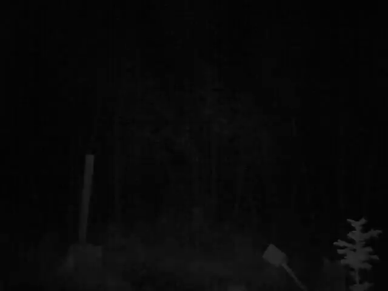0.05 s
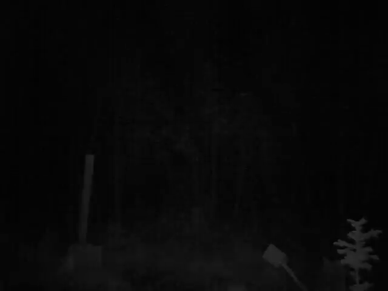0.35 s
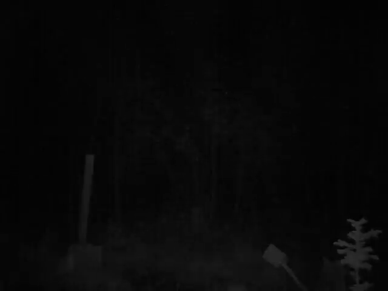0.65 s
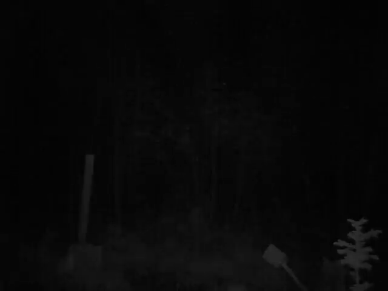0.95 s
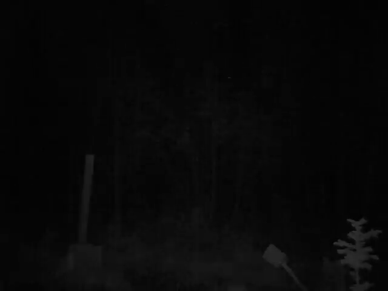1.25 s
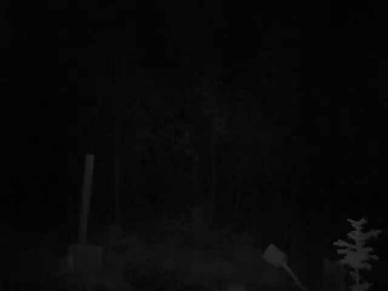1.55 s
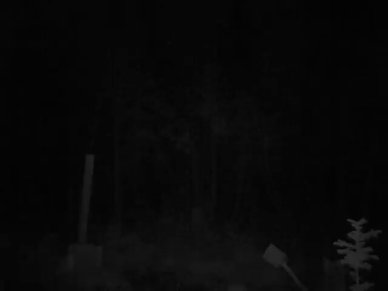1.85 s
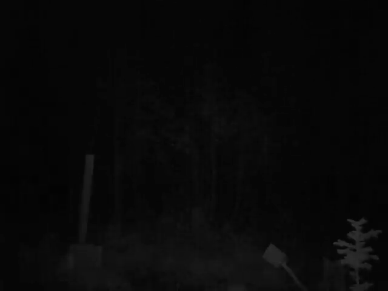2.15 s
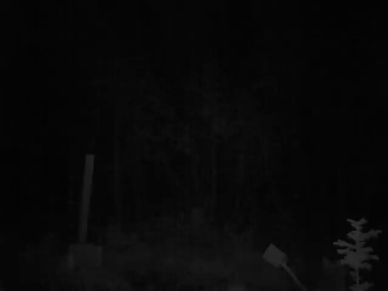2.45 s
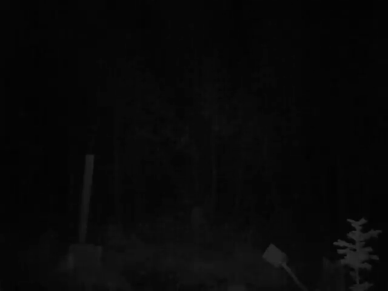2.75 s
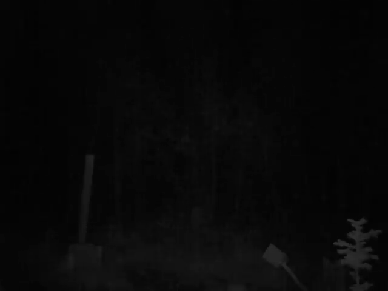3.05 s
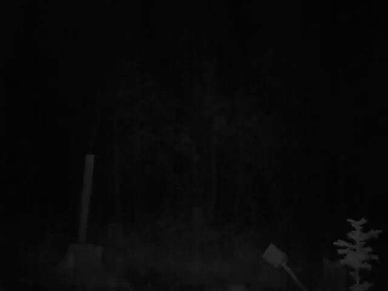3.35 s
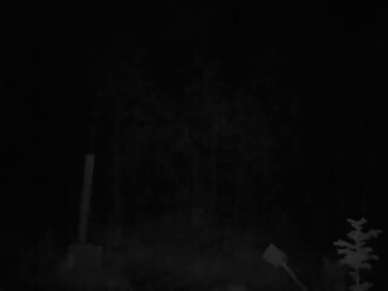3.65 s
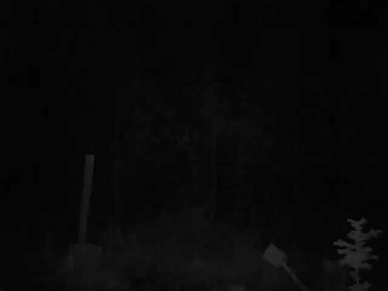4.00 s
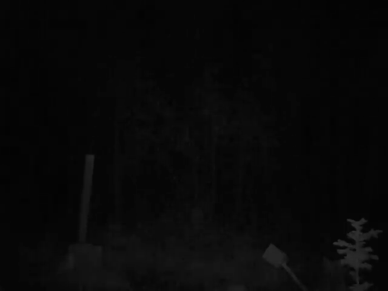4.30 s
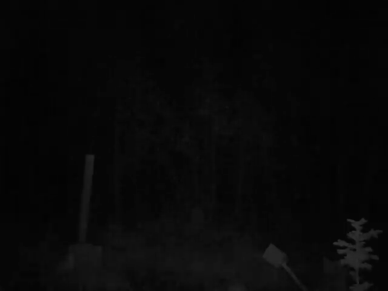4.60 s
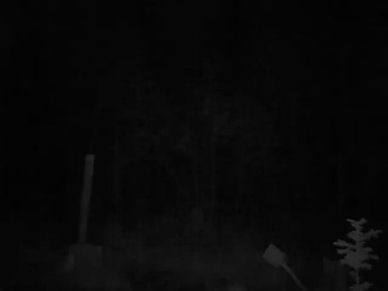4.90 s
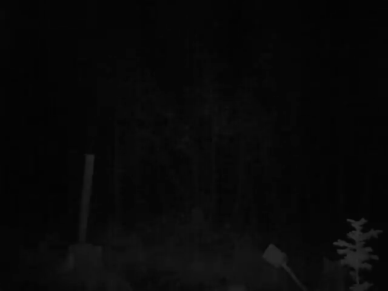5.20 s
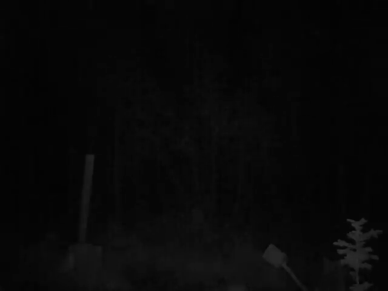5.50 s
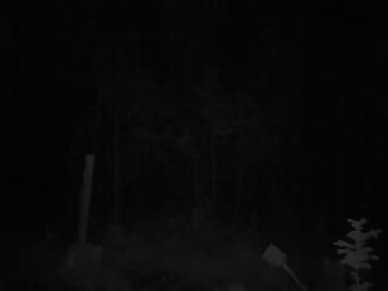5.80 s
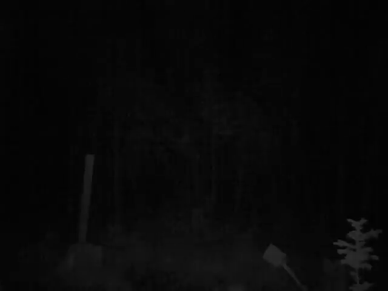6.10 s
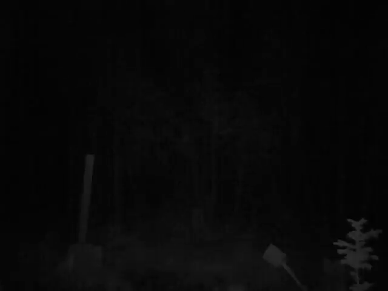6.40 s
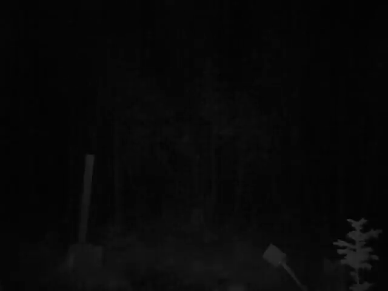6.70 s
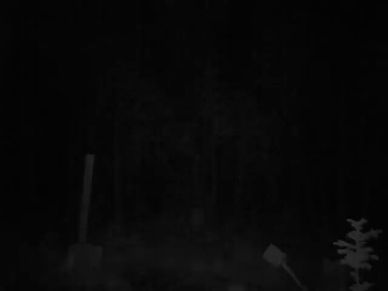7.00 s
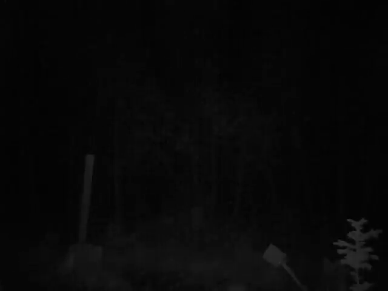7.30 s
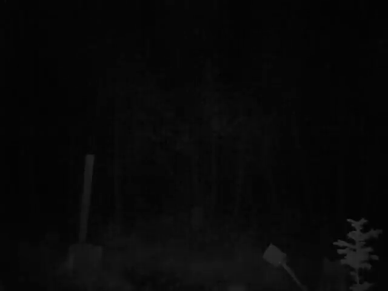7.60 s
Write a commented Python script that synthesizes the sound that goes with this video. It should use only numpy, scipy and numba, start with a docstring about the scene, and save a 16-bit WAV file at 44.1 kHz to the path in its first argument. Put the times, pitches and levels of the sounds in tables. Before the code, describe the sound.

A bull moose gives three short, croaky grunts amid snapping twigs and soft hoof thuds, over steady hiss at a night forest edge.

```python
"""Three short, croaky grunts sound at a forest edge at night: a bull moose.
Each starts tight and rough, then slackens into slow throat pulses that end in a chest thump.
Twigs tick, hooves thud softly and brush rustles, all with a faint echo from the trees.
Low hums come and go. Behind it all lie still forest air and a small recorder's hiss and whine."""
import sys
import numpy as np
from scipy import signal
from scipy.fft import rfft, irfft
from scipy.io import wavfile
from scipy.ndimage import uniform_filter1d
from numba import njit

SR = 44100
rng = np.random.default_rng(int(sys.argv[2]) if len(sys.argv) > 2 else 0)


def store_pcm(level_fs):
    """Save levels as 16-bit WAV."""
    pcm = np.round(np.clip(level_fs, -1, 1) * 32767).astype(np.int16)
    wavfile.write(sys.argv[1], SR, np.atleast_2d(pcm).T)


N = 346185
T = np.arange(N) / SR

# The notes at which the mouth rings, its resonances: (frequency [Hz], width [Hz], relative level [dB])
MOUTH = [(1006, 120, 1.5), (1253, 150, -4), (1540, 190, -13)]
MOUTH_BAND_HZ = (905, 1750)


def undb(db):
    """Turn decibels into a factor to multiply by."""
    return 10 ** (np.asarray(db) / 20)


def unit(x):
    """Scale a sound to an average (rms) level of 1."""
    return x / np.sqrt(np.mean(x ** 2) + 1e-20)


def steady(x):
    """Even out the loudness over a few throat pulses."""
    return x / np.sqrt(uniform_filter1d(x ** 2, size=1400) + 1e-12)


def walk(rate, size):
    """A smooth random wander of about 1 either way, with `rate` new turns a second."""
    hold = max(int(SR / rate), 1)
    stairs = np.repeat(rng.standard_normal(size // hold + 1), hold)
    return 1.335 * uniform_filter1d(stairs, hold)[:size]


def arch(t, length, attack, release):
    """A loudness shape that rises, holds and falls, ending at the given length."""
    return np.clip(t / attack, 0, 1) * np.clip((length - t) / release, 0, 1)


def add(out, start, x):
    """Mix x into out, beginning at `start` seconds."""
    i = int(start * SR)
    out[i:i + len(x)] += x[:len(out) - i]


@njit
def resonate(x, hz, width):
    """A filter that rings around a frequency, which may move every sample."""
    y, band_state, low_state = np.empty(len(x)), 0., 0.
    for i in range(len(x)):
        tuning, damping = np.tan(np.pi * hz[i] / SR), width / hz[i]
        ring = (band_state + tuning * (x[i] - low_state)) / (1 + tuning * (tuning + damping))
        band_state = 2 * ring - band_state
        low_state += 2 * tuning * ring
        y[i] = damping * ring
    return y


def band(x, hz, width):
    """Keep the sound near one frequency by passing it through a resonance twice."""
    hz = np.minimum(hz, SR / 3) * np.ones(len(x))
    return resonate(resonate(x, hz, float(width)), hz, float(width))


def between(x, low_hz, high_hz):
    """Keep the sound between two frequencies."""
    return signal.sosfilt(signal.butter(3, [low_hz, high_hz], "bandpass", fs=SR, output="sos"), x)


def air(level_db=-48, waver_db=0.72):
    """One even noise: forest air in the low range, recorder hiss in the high range."""
    # The tone colour of the noise: (frequency [Hz], relative level [dB])
    spectrum = [(30, -1), (60, -4), (105, 4), (160, -4.5), (230, -3), (330, 1), (440, 2), (620, -0.5),
                (1000, -3), (1500, -6), (2200, -12), (3200, -15), (5500, -17), (7500, -19.5)]
    hz, db = np.transpose(spectrum)
    freqs = np.maximum(np.fft.rfftfreq(N, 1 / SR), 1)
    colour = undb(np.interp(np.log(freqs), np.log(hz), db))
    noise = irfft(rfft(rng.standard_normal(N)) * colour, N)
    return unit(noise) * undb(level_db + waver_db * walk(2.04, N))


def whine(base_hz=767.05, sizzle_hz=4330, width_hz=560, swing_hz=130, sizzle_db=-60.5, throb_db=1.0):
    """The electronics sing steady tones under a thin sizzle that flutters in pitch and strength."""
    # The tones of the whine: (multiple of the base pitch, level [dB])
    harmonics = [(1, -67), (2, -63), (3, -74.5), (8, -65)]
    # The quick wobbles of the sizzle: (rate [Hz], relative strength)
    wobbles = [(40.3, 1), (52.8, 1), (80.4, 0.13)]
    cycles = np.cumsum(base_hz * (1 + .0002 * walk(5, N))) / SR
    tones = sum(undb(db) * np.sin(2 * np.pi * round(k) * cycles) for k, db in harmonics)
    flutter = np.zeros(N)
    for hz, strength in wobbles:
        turns = np.cumsum(hz * (1 + .012 * walk(6, N))) / SR
        flutter += strength * np.sin(2 * np.pi * turns)
    sizzle = band(rng.standard_normal(N), sizzle_hz + swing_hz * flutter, width_hz)
    sizzle *= undb(throb_db * flutter)
    return np.sqrt(2) * tones + undb(sizzle_db) * unit(between(sizzle, 2985, 4660))


def hums(waver=0.026, scoop=0.25, scoop_s=0.028):
    """Nearly pure low tones start flat and slide up to pitch, then glide and waver."""
    # Soft low hums: (time [s], length [s], pitch [Hz], glide [Hz per s], level [dB])
    notes = [(3.84, 0.22, 119, 3, -58), (4.22, 0.28, 92.4, -19, -61), (4.55, .29, 92.3, 14, -55),
             (5.92, 0.275, 123, -90, -45), (6.92, 0.23, 109.6, 0, -56.5), (7.57, 0.11, 103, -14, -49.5),
             (7.69, .16, 100, -38, -49.5)]
    out = np.zeros(N)
    for start, length, pitch, glide, db in notes:
        t = T[:int(length * SR)]
        hz = (pitch + glide * t) * (1 - scoop * np.exp(-t / scoop_s))
        cycles = np.cumsum(hz * (1 + waver * walk(30, len(t)))) / SR
        tone = np.sqrt(2) * np.sin(2 * np.pi * cycles)
        add(out, start, tone * undb(db) * arch(t, length, attack=0.016, release=0.052))
    return out


def tree_echo(x, fade_s=0.55, build_s=0.017, echo_db=-22):
    """Tree trunks scatter a thin, dull echo back."""
    t = T[:SR]
    tail = band(rng.standard_normal(SR), hz=550, width=1900)
    tail *= np.exp(-np.log(1000) * t / fade_s) * (1 - np.exp(-t / build_s))
    return undb(echo_db) * signal.fftconvolve(x, tail / np.linalg.norm(tail))[:N]


def brush(grain_db=3.5, hz=5000, width_hz=9000):
    """Needles and leaves give a fine, grainy rustle that swells and fades with each sweep."""
    # Brush sweeping along the animal: (time [s], length [s], level [dB])
    swishes = [(0.542, 0.25, -61), (0.849, 0.078, -56), (1.049, .08, -58), (1.332, 0.18, -51.5),
               (2.367, .13, -56), (3.03, .14, -61), (3.42, 0.11, -57.5)]
    out = np.zeros(N)
    for start, length, db in swishes:
        t = T[:int(length * SR)]
        grains = rng.standard_normal(len(t)) * undb(grain_db * walk(600, len(t)))
        add(out, start, unit(band(grains, hz, width_hz)) * undb(db) * np.sin(np.pi * t / length))
    return out


def hooves(crunch_spread=1.1, crunch_decay_s=0.02, press_s=0.0015):
    """A hoof sets the ground ringing briefly and crushes the dead leaves on it."""
    # Steps on soft ground:
    # (time [s], thud level [dB], ground note [Hz], decay [s], crunch level [dB], crunch centre [Hz])
    steps = [(.649, -36.5, 69.5, 0.014, -39.5, 273), (1.135, -36, 60.8, 0.012, -57.5, 458),
             (1.759, -44, 65.4, 0.051, -49, 453), (3.039, -45, 91.6, 0.038, -56, 436),
             (3.319, -37, 118.3, 0.01, -59, 348), (3.486, -32.5, 99, 0.011, -45, 190),
             (6.668, -47.5, 62.5, 0.019, -56, 170)]
    out, t = np.zeros(N), T[:SR // 5]
    press = 1 - np.exp(-t / press_s)
    for start, db, hz, decay, crunch_db, crunch_hz in steps:
        thud = -np.sin(2 * np.pi * hz * t) * np.exp(-t / decay)
        crunch = unit(band(rng.standard_normal(len(t)), crunch_hz, crunch_spread * crunch_hz))
        crunch *= np.exp(-t / crunch_decay_s)
        add(out, start, press * (undb(db) * thud + undb(crunch_db) * crunch))
    return out


def twigs(splinter=0.1, splinter_cycles=5.8, wood_db=-14, wood_decay_s=0.0072):
    """A twig breaks sharply and splinters over a duller wood crackle; thick, low ones splinter longer."""
    # Twigs snapping: (time [s], level [dB], ring frequency [Hz], ring width [Hz])
    snaps = [(.594, -37, 6500, 3470), (.653, -31, 1150, 1500), (0.6558, -35.5, 6000, 5000),
             (.696, -33.5, 4700, 3020), (.882, -34, 4000, 4960), (0.8986, -30.5, 6670, 2000),
             (1.012, -43, 2350, 450), (3.0528, -32.5, 7000, 3000), (3.11, -35.5, 7040, 3000),
             (3.133, -37, 6500, 3000), (3.362, -22, 7460, 2600), (3.486, -35, 2600, 3500),
             (3.622, -40.5, 6500, 3000), (3.934, -36.5, 1430, 900), (7.738, -37.5, 2400, 3500)]
    out, t = np.zeros(N), T[:SR // 16]
    for start, db, hz, width in snaps:
        crack = splinter * rng.standard_normal(len(t)) * np.exp(-t * hz / splinter_cycles)
        crack[0] += 1  # the break itself
        snap = band(crack, hz, width)
        wood = band(rng.standard_normal(len(t)) * np.exp(-t / wood_decay_s), hz=1600, width=4500)
        add(out, start, undb(db) * (snap / np.abs(snap).max() + undb(wood_db) * wood / np.abs(wood).max()))
    return out


def mouth(source, tuning=1.0, bright_db=0):
    """The mouth rings like a tube; tuning shifts its resonances and bright_db lifts the upper ones."""
    out = np.zeros(len(source))
    lift_db = np.linspace(0, bright_db, len(MOUTH))
    for k, (hz, width, db) in enumerate(MOUTH):
        ring = resonate(source, hz * tuning * np.ones(len(source)), float(width))
        out += (-1) ** k * undb(db + lift_db[k]) * ring  # a tube's resonances alternate in sign
    return between(out, *MOUTH_BAND_HZ)


def rasps(edge_s=0.0038):
    """Rushing air rings the mouth, brighter than the voice does."""
    # Harsh breaths where a grunt catches or runs out: (time [s], length [s], level [dB])
    breaths = [(0.985, .04, -53), (2.376, 0.03, -46), (5.202, .024, -46)]
    out = np.zeros(N)
    for start, length, db in breaths:
        t = T[:int(length * SR)]
        rasp = unit(mouth(rng.standard_normal(len(t)), bright_db=11))
        add(out, start, rasp * undb(db) * arch(t, length, edge_s, edge_s))
    return out


def thump(hz, rise_s=0.0082, decay_s=0.014):
    """The chest rings on briefly as the throat shuts."""
    t = T[:SR // 6]
    return np.sqrt(2) * np.sin(2 * np.pi * hz * t) * (1 - np.exp(-t / rise_s)) * np.exp(-t / decay_s)


def voice(hz, throat_db, mouth_db, chest_gain, rough, first_hz, second_hz, second_db, width_hz=75.0):
    """Uneven throat pulses and puffs of breath ring throat and mouth; the chest adds the lowest tone."""
    size = len(hz)
    cycles = np.cumsum(hz * (1 + .15 * rough * walk(130, size))) / SR
    clicks = np.diff(np.floor(cycles), prepend=-1)  # one click per cycle
    pulses = unit(clicks * undb(5 * rough * walk(130, size)))
    puffs = unit(np.exp(-(cycles % 1) / .3) * rng.standard_normal(size))
    source = pulses + 1.2 * rough * puffs
    first_ring = resonate(source, first_hz, width_hz)
    second_ring = undb(second_db) * resonate(source, second_hz, width_hz)
    throat = steady(between(first_ring - second_ring, 255, 690))
    mouth_ring = steady(mouth(source, tuning=(first_hz / 400) ** 0.12))  # sinks a little with the throat
    chest = np.sqrt(2) * np.cos(2 * np.pi * cycles - 2)
    return throat * undb(throat_db) + mouth_ring * undb(mouth_db) + chest * chest_gain


def moose(catch_s=.015, closing_s=.016, release_s=0.011, thump_lift_db=8):
    """In each grunt the pulses slow down while the mouth opens and the chest joins in; a thump ends it."""
    # The grunts; the last takes two rows, a tight croak and then a slack one an octave lower:
    # (time [s], length [s], starting pulse rate [Hz], pulse rate it heads for [Hz], throat level [dB],
    #  mouth level [dB], chest level [dB], roughness [0-1], first throat resonance [Hz],
    #  second resonance with mouth shut [Hz], with mouth open [Hz], its relative level [dB], thump [Hz])
    grunts = [(0.801, 0.22, 152.9, 88, -41, -53, -40, .18, 349, 425, 650, -4, 100),
              (2.245, 0.15, 145.6, 89.5, -39.5, -48, -36.5, .22, 354, 480, 650, -.5, 102),
              (5.203, .097, 242, 202.8, -41.5, -44.5, -56, .07, 445, 564, 520, -2, 100),
              (5.298, .094, 118.1, 104.9, -41, -43.5, -35.5, 0.21, 393, 483, 625, -0.5, 79.6)]
    out = np.zeros(N)
    for (start, length, start_hz, end_hz, throat_db, mouth_db, chest_db, rough,
         first_hz, shut_hz, open_hz, second_db, thump_hz) in grunts:
        t = T[:int(length * SR)]
        progress = t / length
        opening = progress ** 2.05
        catch = np.exp(-t / catch_s)  # the voice starts rough, then settles
        closing = np.exp((t - length) / closing_s)  # as the air runs out, the pulses sag and roughen
        hz = start_hz * (end_hz / start_hz) ** progress * (1 - .13 * closing)
        grunt = voice(hz=hz,
                      throat_db=throat_db - 8 * (progress - 0.77) ** 2,  # loudest late in the grunt
                      mouth_db=mouth_db + 3.5 * (opening - .5),
                      chest_gain=undb(chest_db) * progress ** 2.1,
                      rough=rough + .45 * catch + .2 * closing,
                      first_hz=first_hz * (hz / start_hz) ** 0.15,  # sinks as the pulses slow
                      second_hz=shut_hz + (open_hz - shut_hz) * opening,
                      second_db=second_db)
        add(out, start, grunt * arch(t, length, 0.11 * length, release_s))
        add(out, start + length - release_s / 2, undb(chest_db + thump_lift_db) * thump(thump_hz))
    return out


def scene():
    """The animal and its echo over the quiet background, in one channel."""
    animal = moose() + rasps() + twigs() + hooves() + brush()
    return (animal + tree_echo(animal) + hums() + air() + whine())[None]


def record(dry):
    """The recorder cuts the treble and shifts the whole wave by a constant, silent offset."""
    top_hz, offset = 8100, -.281
    treble_cut = signal.firwin(81, top_hz, window=("kaiser", 8), fs=SR)
    return signal.fftconvolve(dry, treble_cut[None], mode="same") + offset


dry = scene()
out = record(dry)
store_pcm(out)
```